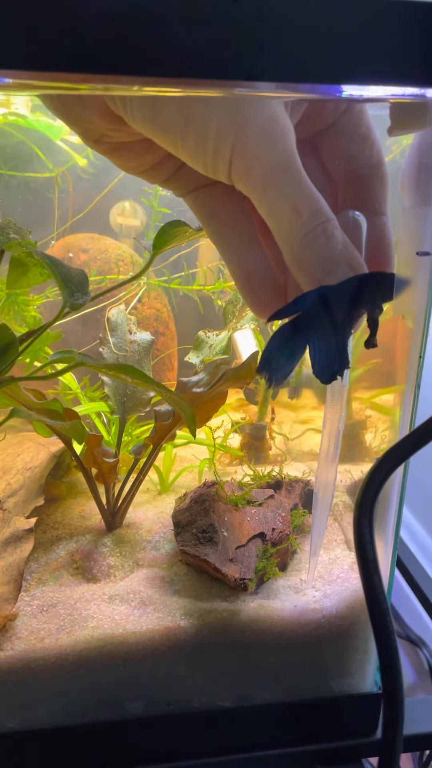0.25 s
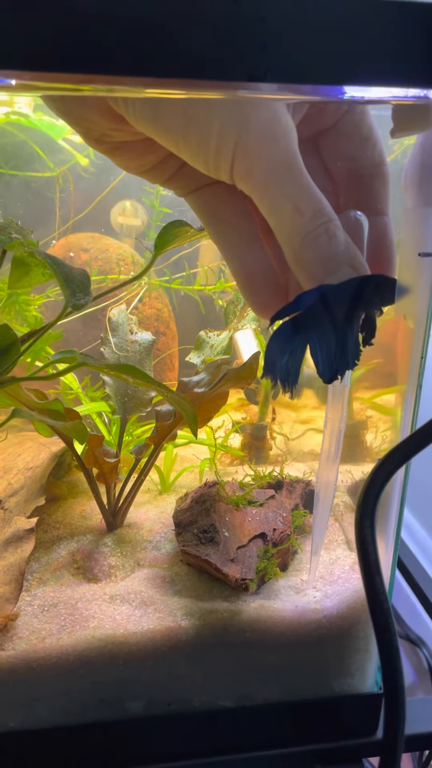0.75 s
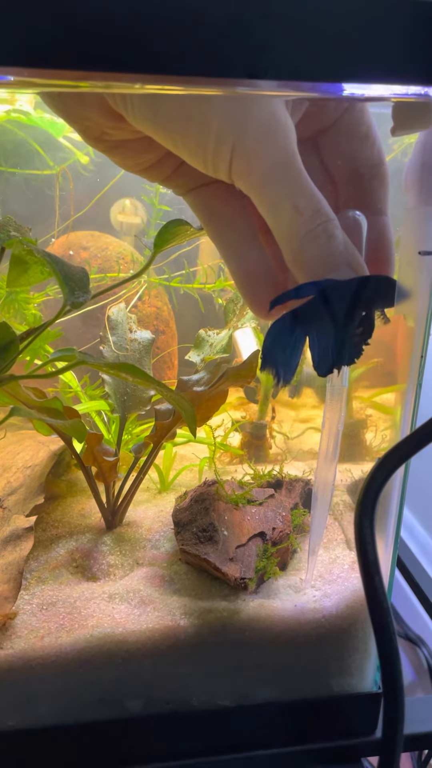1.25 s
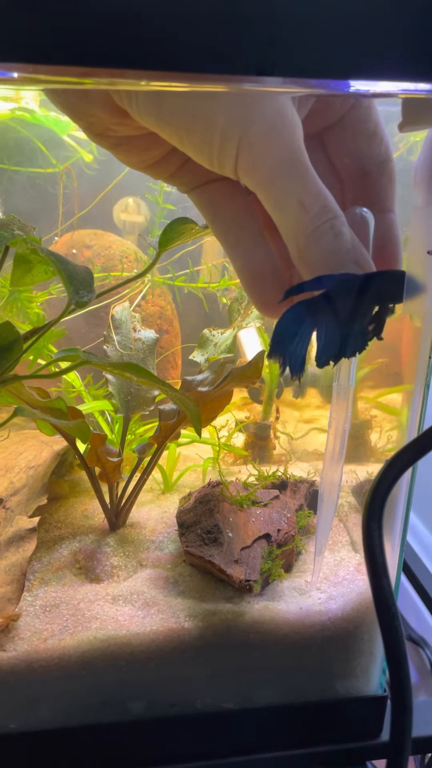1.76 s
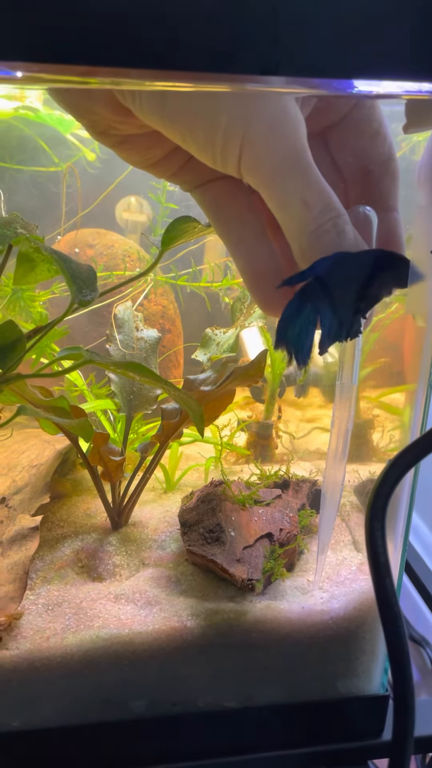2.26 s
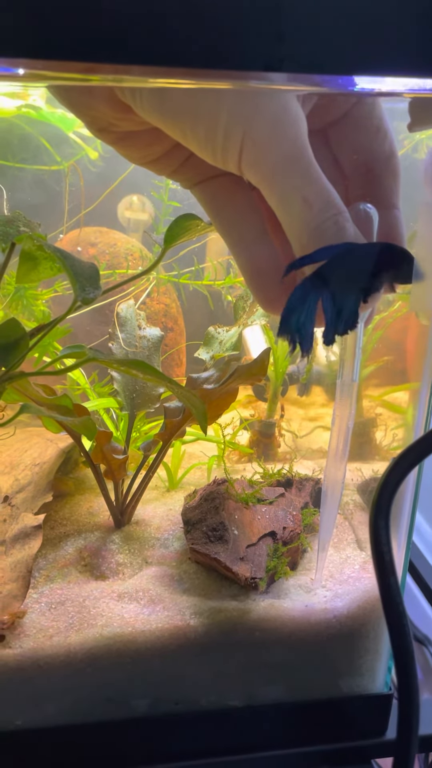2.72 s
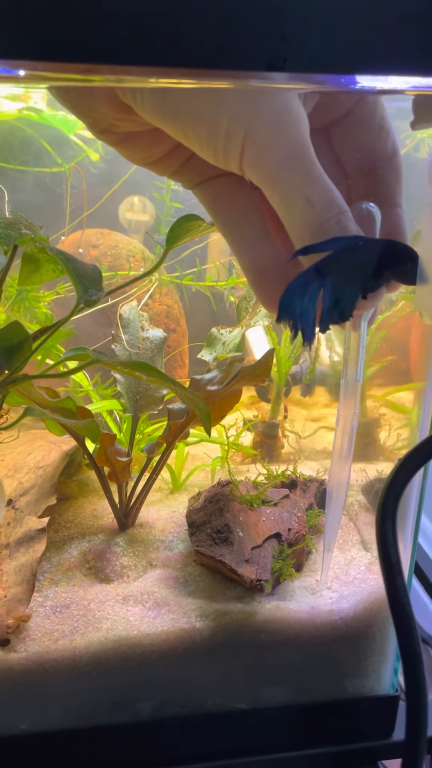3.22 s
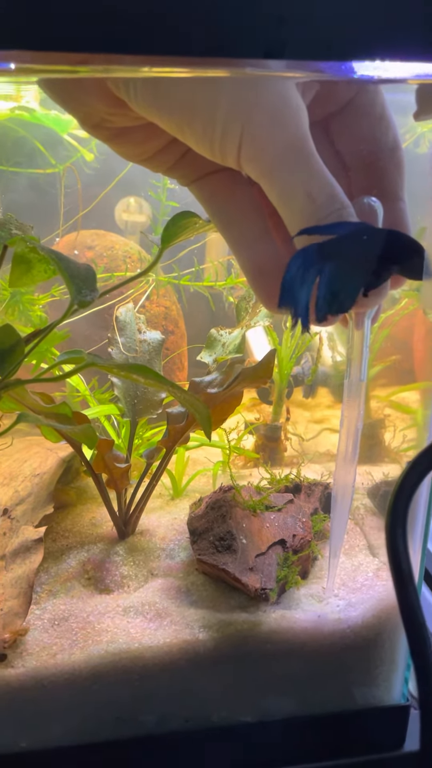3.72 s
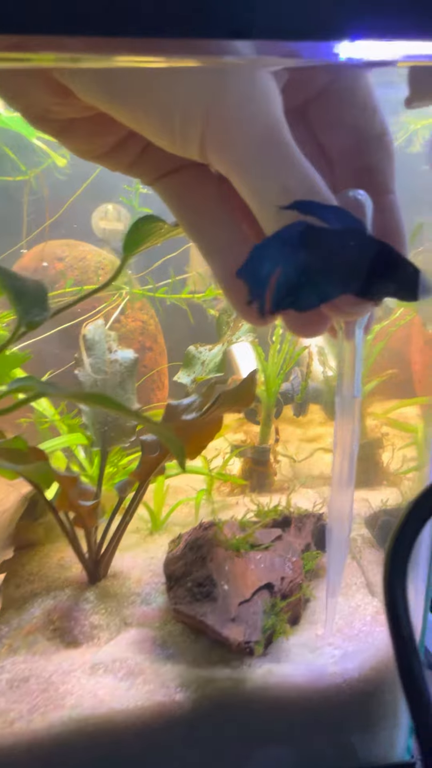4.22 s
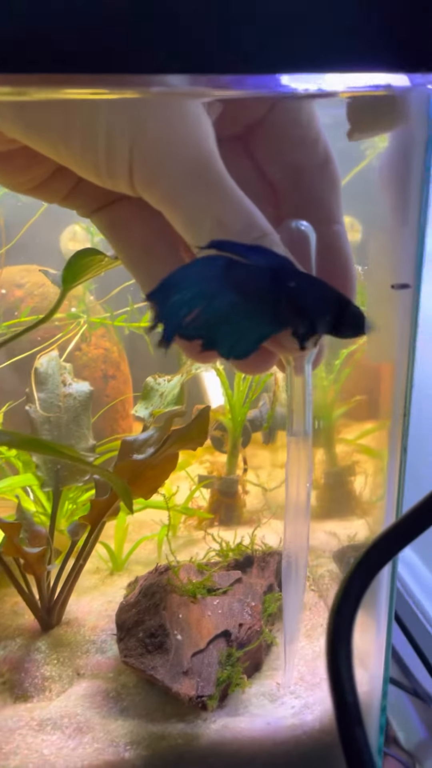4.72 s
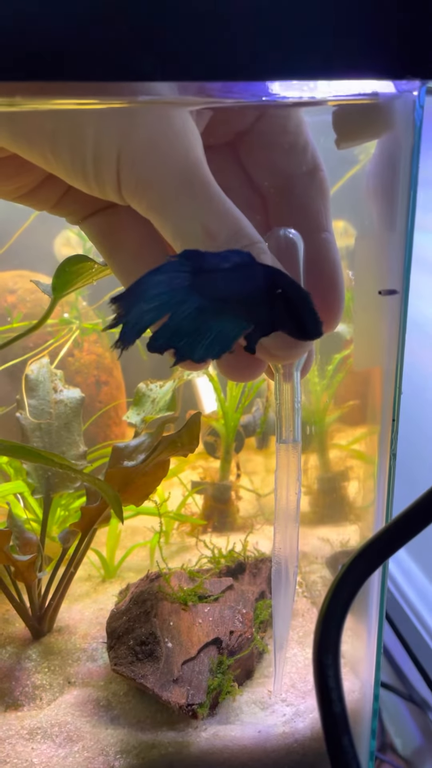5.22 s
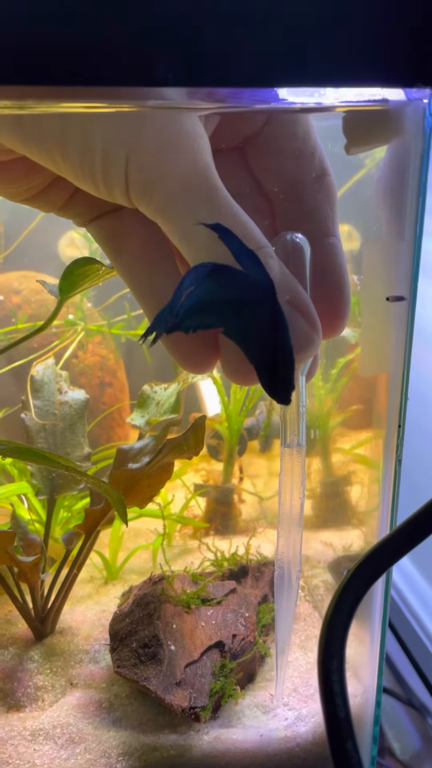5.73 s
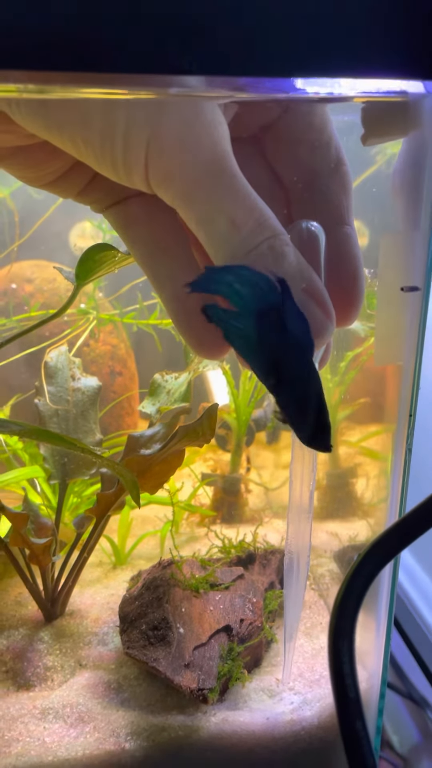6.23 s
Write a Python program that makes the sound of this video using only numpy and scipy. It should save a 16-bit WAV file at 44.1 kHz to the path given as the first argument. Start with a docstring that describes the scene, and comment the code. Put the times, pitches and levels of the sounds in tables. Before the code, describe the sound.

From 0 to about 6.5 s, aquarium pumps run without pause in a quiet room, close to a hand-held phone. A deep steady hum near 60 Hz and its double swells slightly, with a fast pulsing rattle from a diaphragm pump in every cycle. Over it lies a soft, wide rush of air and water. A thin noisy whistle around 1.3 kHz, stronger on the left, flutters irregularly, rising at the start, near 1.7 to 2 s and briefly at 6.2 s. Tiny bright bubble bursts tick throughout, a sharper one at 5 s. A faint, short glass tap comes at 0.56 s. A dull little knock falls at 3.4 s. Between 3.5 and 4.4 s the phone moves, subtly changing the colour of rush and rattle and thinning the whistle. Small, briefly ringing drips follow at 4.8, 5.3 and 5.85 s. The hum continues to the end.

```python
"""Aquarium pumps in a quiet room, close to a hand-held phone. From start to end they hum at the mains
frequency, and a diaphragm pump rattles in every cycle over the rush of air and water. A thin, noisy whistle
varies in level by chance and fine bubbles tick at the surface. A faint tap on the glass comes in the first
second. The phone moves mainly between 3.5 and 4.4 s, near a few drips that ring briefly.
Sines make the hum, filtered noise the rush and whistle, and short decaying rings the rest."""
import sys
import numpy as np
from scipy import signal
from scipy.fft import rfft, irfft, next_fast_len
from scipy.io import wavfile
from scipy.ndimage import uniform_filter1d

SR = 44100
rng = np.random.default_rng(int(sys.argv[2]) if len(sys.argv) > 2 else 0)


def wav_out(sig):
    """Save sig, one row per channel (or a flat mono array), as 16-bit PCM at SR to the path in sys.argv[1]."""
    wavfile.write(sys.argv[1], SR, np.round(np.clip(np.atleast_2d(sig).T, -1, 1) * 32767).astype(np.int16))


N = 285327  # length in samples
MAINS_HZ = 59.986

# How late a sound is at the right microphone port. Each row: frequency in Hz, right lag in radians.
LAG = [(200, 0), (1400, -.2), (2300, 1.2), (4200, 1.1), (4800, -.1), (5700, 1), (7200, 3.14), (8100, 3.2),
       (11000, 6.28), (14500, 9.42), (15800, 10.6)]


def gain_of(db):
    """Turns decibels into a plain factor."""
    return 10 ** (np.asarray(db) / 20)


def read(points, hz):
    """Reads a curve between its points, along a logarithmic frequency scale."""
    f, value = np.transpose(points)
    return np.interp(np.log(hz + 1), np.log(f + 1), value)


def add(mix, s, sound):
    """Adds a short sound to the mix at s seconds, cut off at the end of the mix."""
    part = mix[:, round(s * SR):][:, :sound.shape[1]]
    part += sound[:, :part.shape[1]]


def slow(hz, count):
    """Slow chance: noise smoothed above about hz, with rms 1."""
    noise = rng.standard_normal((count, N))
    x = signal.lfilter([1], [1, -np.exp(-2 * np.pi * hz / SR)], noise)
    return x / x.std()


def moved():
    """Share of the phone's way from the first spot to the second, at every sample."""
    # Each row: time in seconds, share of the way (0-1).
    move = [(0, 0.14), (1.8, 0.05), (3.5, 0.2), (4.4, 1), (6.47, 0.99)]
    return np.clip(np.interp(np.arange(N) / SR, *np.transpose(move)), 0, 1)


def between_spots(levels_db, way):
    """Level in dB at each port as the phone moves between its two spots."""
    first_db, second_db = np.reshape(levels_db, (2, 2, 1))
    return first_db + way * (second_db - first_db)


def ports(a, b, colour_db):
    """Colours a sound and hands it to both microphone ports; only the right port hears b."""
    # How alike the two ports sound. Each row: frequency in Hz, likeness (0-1).
    likeness = [(60, .999), (130, .98), (290, .85), (640, .55), (1400, .5), (3000, .48), (4500, .4),
                (6300, .5), (7100, .99), (8200, .99), (9000, .93), (15000, .97)]
    # Which port is louder. Each row: frequency in Hz, left minus right in dB.
    balance_db = [(60, 2), (180, 2), (550, 3.5), (1650, 1.6), (4970, 1), (8000, -1.5), (15000, 0.5)]
    hz = np.fft.rfftfreq(len(a), 1 / SR)
    same = np.clip(read(likeness, hz), 0, 1)
    left, own = rfft(a), rfft(b)
    tilt = gain_of(read(balance_db, hz) / 2)
    right = same * left + np.sqrt(1 - same ** 2) * own
    right = right * np.exp(-1j * read(LAG, hz))
    pair = np.array([left * tilt, right / tilt])
    return irfft(pair * gain_of(colour_db(hz)), len(a))


def shelf(x):
    """Standing waves lift and thin narrow bands, differently at each port and spot."""
    # Waves between tank, shelf and wall. Each row: frequency in Hz, half width in Hz,
    # boost in dB left and right at the first spot, then left and right at the second.
    standing = [(221, 6.2, 8.5, 6, 8.5, 7), (286, 10, 4.5, 5, 2, 1.5), (697, 47, 3.5, -4, 0, 2),
                (954, 17, -5, -1.5, -13, -2), (1156, 72, -4.5, 7, 5, 2.5), (1508, 14, 0, 9, 3, 9.5),
                (1626, 30, 7.5, 6, 2, 5), (1818, 21, -4, 0, 7, 10), (2040, 54, 5.5, 3.5, 3.5, -0.5),
                (2180, 25, -2, -2, -5, -5), (2297, 50, 8, 8.5, 0.5, 4.5), (2580, 40, 3, 2, 6.5, 5.5),
                (2725, 30, -3, -5, 0, -1), (2887, 25, 4, 5.5, 11.5, 11), (3180, 33, 5, 3, 9, 6.5),
                (3370, 45, 3.5, 5, 0, 1), (3630, 100, 0.5, 1, 0, 1), (3850, 32, 7.5, 6, 7, 7),
                (4000, 40, 0, 0, 3, 6), (4470, 90, 1, 1, 1.5, -1), (5120, 42, 5, 2, 1, 1)]
    size = next_fast_len(N)
    f, z = np.fft.rfftfreq(size, 1 / SR), rfft(x, size)
    boost_db = 0
    for hz, half_hz, *db in standing:
        boost_db = boost_db + np.array(db)[:, None] / (1 + ((f - hz) / half_hz) ** 2)
    first, second = irfft(z * gain_of(boost_db).reshape(2, 2, -1), size)[..., :N]
    return (1 - moved()) * first + moved() * second


def tremble(x, patchy_db=1.4):
    """The hand never holds still: narrow bands drift up and down, partly alike at both ports."""
    z = signal.stft(x, nperseg=2048, noverlap=1024)[2]
    patches = rng.standard_normal((z.shape[2], z.shape[1], 3)).T
    for _ in range(2):
        patches = uniform_filter1d(patches, size=3, axis=1)  # smooth across frequency
        patches = uniform_filter1d(patches, size=9, axis=2)  # smooth along time
    patches = patches[:2] + patches[2]  # each port's own part plus a shared one
    above = np.clip(np.arange(z.shape[1]) / 40, 0, 1)[:, None]  # long waves hardly change
    z = z * gain_of(patchy_db * above * patches / patches.std())
    return signal.istft(z, nperseg=2048, noverlap=1024)[1][:, :N]


def rush(split_hz=6000):
    """Rush of air and water: wide noise in two bands, body and fizz, each with slight random level changes."""
    # Colour of the noise. Each row: frequency in Hz, level in dB per Hz.
    rush_colour = [(25, -92), (40, -87), (70, -79), (110, -77.5), (150, -81.5), (200, -85.5), (340, -86),
                   (600, -87.5), (970, -88), (1150, -89), (2000, -93), (3200, -96.5), (5000, -100.5),
                   (7000, -105.5), (9500, -108.5), (12300, -112.5), (15500, -108)]
    a, b, c, d = rng.standard_normal((4, next_fast_len(N))) * np.sqrt(SR / 2)

    def body_db(hz):
        return read(rush_colour, hz) - 10 * np.log10(1 + (hz / split_hz) ** 4)

    def fizz_db(hz):
        return read(rush_colour, hz) - 10 * np.log10(1 + (split_hz / (hz + 1)) ** 4)

    body = ports(a, b, body_db)[:, :N] * gain_of(.3 * slow(6, count=1))
    fizz = ports(c, d, fizz_db)[:, :N] * gain_of(.7 * slow(5, count=1))
    return body + fizz


def whistle(half_hz=38, vary_db=1.2, vary_hz=25.0, pitch_vary_hz=16.0, firm_per_db=.3, core=.3):
    """Air noise in one narrow hollow, nearer the left port; its level and pitch vary by chance."""
    # Level change and pitch of this noise over time. Each row: time in seconds, level change in dB, pitch in Hz.
    course = [(0, 5, 1325), (.12, 2.5, 1325), (.33, -2.5, 1320), (.46, .5, 1319), (.7, -1, 1319),
              (1.1, -1, 1320), (1.66, -0.5, 1319), (1.73, 4.5, 1314), (1.9, 1, 1322), (1.99, 4.5, 1322),
              (2.06, -1.5, 1326), (2.25, 0, 1322), (2.7, -2, 1321), (2.92, 2.5, 1320), (3.2, -2, 1318),
              (3.8, 0, 1318), (4.4, -0.5, 1310), (5.2, 0, 1308), (6.15, -1, 1305), (6.23, 8, 1302),
              (6.3, 1.5, 1298), (6.47, 0, 1303)]
    # Level before these changes, a row for the first spot and one for the second: left dB, right dB.
    spot_db = [(-58.5, -65.5), (-62, -73)]
    s, change_db, hz = np.transpose(course)
    t, r = np.arange(N) / SR, np.exp(-2 * np.pi * half_hz / SR)
    change_db = np.interp(t, s, change_db)
    a, b = rng.standard_normal((N, 2)).T
    pitch_hz = np.interp(t, s, hz) + pitch_vary_hz * slow(17.8, count=1)[0]
    turn = np.exp(2j * np.pi * np.cumsum(pitch_hz) / SR)
    air = signal.lfilter([1], np.convolve([1, -r], [1, -r]), a + 1j * b)
    firm = core + firm_per_db * np.maximum(change_db, 0)  # more steady tone where the level is raised
    x = (turn * (air / air.std() + firm) / np.sqrt(1 + firm ** 2)).real
    level_db = between_spots(spot_db, moved()) + change_db + vary_db * slow(vary_hz, count=1)
    return gain_of(level_db) * x / x.std()


def tick(db, hz, t60=0.037, spread=0.18):
    """One bursting bubble: a snap with a short noisy tail, heard in one band."""
    # spread: half width of the band as a share of its centre; t60: seconds for the tail to fall 60 dB
    t = np.arange(1024) / SR - .0025
    tail = 0.2 * gain_of(-60 * t / t60)
    snap = gain_of(-60 * abs(t) / 0.005)
    a, b = (t > 0) * (tail + snap) * rng.standard_normal((2, 1024))
    pair = ports(a, b, lambda f: -6 * ((f - hz) / (spread * hz)) ** 2)
    return gain_of(db) * pair / abs(pair).max()


def bubbles(per_s=60., faintest_db=-67):
    """Bubbles bursting at the surface: loud ones from a table, many small ones by chance."""
    # The loudest bursts. Each row: time in seconds, peak in dB, centre of the band in Hz.
    loud_bursts = [(.125, -48, 14000), (.415, -56, 9700), (1.6242, -51, 14000), (1.926, -49, 9660),
                   (2.3401, -51, 12550), (2.8484, -46, 14600), (4.404, -46, 13000), (4.6494, -56, 11000),
                   (4.9886, -42, 15300), (5.024, -53, 11900), (6.082, -44, 11900)]
    out = np.zeros((2, N))
    for s, *sound in loud_bursts:
        add(out, s - .002, tick(*sound))
    for u, v, w in rng.random((int(per_s * N / SR), 3)):
        louder_db = -3 * np.log(1 - .95 * v)  # most are faint, a few up to 9 dB louder
        add(out, u * N / SR, tick(faintest_db + louder_db, 7000 + 8500 * w))
    return out


def taps(rise_cycles=1.6):
    """Taps and drips: each row is a single short ring, often rising, that the room smears a little."""
    # Each row: start in seconds, level in dB, pitch in Hz, seconds to fall 60 dB,
    # pitch rise in Hz per second, left minus right in dB.
    rings = [(.420, -57, 4620, .025, 0, 8), (.5570, -42.5, 1980, 0.032, 8000, 4),
             (0.564, -50, 2580, .025, 20000, 0), (.565, -46.5, 3000, .03, 0, 0),
             (.566, -50, 3350, .022, 30000, 2), (.5695, -50, 3650, .025, 0, 0),
             (.576, -50, 1700, 0.046, -3000, 2), (2.106, -58, 5400, 0.027, 20000, -4),
             (3.396, -47, 620, .09, 0, -8), (4.753, -46, 503, .08, 2000, -2),
             (4.808, -49, 1050, .04, 5000, 4), (5.322, -47, 1240, .06, 10000, 6),
             (5.8545, -46, 4060, 0.031, 15000, -1), (5.8545, -56, 4600, .02, 0, -1)]
    out, t = np.zeros((2, N)), np.arange(3000) / SR
    for s, db, hz, t60, rise, pan_db in rings:
        fade = gain_of(db - 60 * t / t60)
        onset = 1 - np.exp(-t * hz / rise_cycles)
        ring = np.sin(2 * np.pi * (hz + rise * t / 2) * t) * fade * onset
        echoes = rng.standard_normal((2, len(t))) * gain_of(-33 - 60 * t / .06)
        pair = ring + signal.fftconvolve(ring[None], echoes, axes=1)[:, :len(t)]
        add(out, s, gain_of([[pan_db / 2], [-pan_db / 2]]) * pair)
    return out


def buzz(at=.07, scatter=.25):
    """The strongest orders of the rattle as steady sines, loosely lined up early in each cycle."""
    # Each row: multiple of mains, dB rms left and right at the first spot, left and right at the second.
    orders = [(25, -80.0, -83.0, -77.0, -74.0), (34, -90.0, -75.0, -82.0, -82.0),
              (35, -78.0, -75.0, -80.0, -79.0), (37, -77.0, -80.0, -79.0, -80.0),
              (38, -77.0, -90.0, -80.0, -75.0), (39, -75.0, -78.0, -79.0, -80.0),
              (40, -81.0, -81.0, -79.0, -76.0), (43, -76.0, -78.0, -84.0, -78.0),
              (44, -76.0, -78.0, -84.0, -79.0), (45, -78.0, -77.0, -74.0, -77.0),
              (48, -80.0, -81.0, -81.0, -78.0), (49, -81.0, -78.0, -75.0, -76.0),
              (51, -79.0, -89.0, -76.0, -78.0), (53, -82.0, -86.0, -76.0, -80.0),
              (54, -82.0, -78.0, -82.0, -79.0), (55, -84.0, -77.0, -89.0, -86.0),
              (56, -79.0, -76.0, -90.0, -84.0), (58, -77.0, -77.0, -78.0, -89.0),
              (60, -78.0, -79.0, -80.0, -90.0), (62, -81.0, -81.0, -84.0, -87.0),
              (67, -87.0, -90.0, -80.0, -79.0), (68, -79.0, -81.0, -82.0, -86.0),
              (70, -80.0, -79.0, -83.0, -84.0), (72, -83.0, -85.0, -79.0, -81.0),
              (75, -83.0, -84.0, -78.0, -79.0), (79, -83.0, -79.0, -87.0, -84.0),
              (81, -83.0, -79.0, -88.0, -81.0), (84, -83.0, -90.0, -85.0, -81.0),
              (86, -81.0, -82.0, -83.0, -82.0), (92, -90.0, -90.0, -82.0, -82.0)]
    t, out, way = np.arange(N) / SR, np.zeros((2, N)), moved()
    for (k, *db), (a, b) in zip(orders, rng.standard_normal((len(orders), 2))):
        lag = (read(LAG, k * MAINS_HZ) + .9 * b) * np.array([[.5], [-.5]])
        turns = k * (MAINS_HZ * t - at) + scatter * a  # at: share of the mains cycle
        tone = np.sqrt(2) * np.cos(2 * np.pi * turns + lag)
        out += gain_of(between_spots(db, way)) * tone
    return out


def rattle(t60=0.24, head=4.5, head_t60=0.0098):
    """Knocks in every cycle ring the case and room; the ringing is new at each spot of the phone."""
    # Colour of the pump case. Each row: frequency in Hz, level in dB per Hz before the knock's own level.
    case_colour = [(900, -115), (1400, -101), (2000, -105), (2800, -105), (4000, -105), (5500, -105),
                   (7500, -109), (9500, -113.5), (11500, -119), (14000, -122)]
    # Knocks within one mains cycle. Each row: share of the cycle, level in dB,
    # brightness in dB per octave about 4 kHz, unevenness in dB.
    knock_rows = [(.04, -4, -1, 1), (.21, -5, 4, 2.5), (.57, -6, -4, 1)]
    cycles, out, t = np.arange(N / SR * MAINS_HZ - 1), np.zeros((2, N)), np.arange(8192) / SR
    way = moved() * np.pi / 2
    late = np.maximum(t - 64 / SR, 0)  # room ahead of the ring, cut off again below
    # sharp head, diffuse tail
    decay = (late > 0) * (gain_of(-60 * late / t60) + head * gain_of(-60 * late / head_t60))
    decay = decay / np.linalg.norm(decay) * SR / np.sqrt(2 * MAINS_HZ)
    for share, db, bright_db, uneven_db in knock_rows:
        knocks = np.zeros(N + 64)
        places = np.round((cycles + share) / MAINS_HZ * SR).astype(int)
        knocks[places] = gain_of(db + uneven_db * rng.standard_normal(len(cycles)))

        def colour_db(hz):
            return read(case_colour, hz) + bright_db * np.log2(np.maximum(hz, 300) / 4000)

        for window in (np.cos(way), np.sin(way)):  # first spot, second spot
            a, b = rng.standard_normal((2, len(t))) * decay
            ring = ports(a, b, colour_db)
            out += signal.oaconvolve((knocks[:N] * window)[None], ring, axes=1)[:, 64:N + 64]
    return out


def hum():
    """Sines on the mains orders: three low ones sway the case, the upper ones line up into a thump."""
    # Each row: multiple of mains, dB rms left and right at the first spot, left and right at the second.
    orders = [(1, -43.5, -43.5, -43.5, -43.5), (2, -43, -43.5, -43, -43.5), (3, -54.5, -54.5, -54, -54),
              (4, -72, -73, -71, -71.5), (5, -62.5, -63.5, -62, -63), (6, -57.5, -61, -58.5, -61),
              (7, -71.5, -69.5, -69.5, -68.5), (8, -69, -73.5, -67, -72), (9, -66, -63, -64, -62.5),
              (10, -68.5, -69.5, -67.5, -68.5), (11, -71, -83, -70, -78), (12, -65.5, -73, -67.5, -72),
              (13, -64.5, -65.5, -66, -65.5), (14, -62.5, -72.5, -68.5, -71), (15, -74, -74, -80, -73.5),
              (17, -74, -76, -71, -76), (19, -75.5, -79, -71, -79)]
    # The lowest order swells and fades. Each row: time in seconds, level change in dB.
    swells = [(0, 0), (.4, 1), (.85, -2.5), (1.6, 1), (2.2, -1.2), (3.3, 1.1), (4.1, -1.3), (4.6, 2),
              (5.4, 0), (6.47, 1.5)]
    # Upper orders reach the ports apart. Each entry: multiple of mains, right lag in radians.
    port_lag = {4: .4, 5: .2, 6: -.3, 9: -.4, 11: 1.9, 12: -1.2, 13: -.3, 15: -.8}
    # Share of the mains cycle at which the thump arrives, at the first and the second spot.
    thump_at = (.093, .065)
    # Orders that swing apart from the thump. Each entry: multiple of mains, share of its own cycle.
    swing = {7: .37, 8: .53, 9: .13, 14: -.08, 15: .13}
    # Faint steady tones of a slower rotor. Each row: frequency in Hz, dB rms.
    rotor = [(48.5, -69.5), (73.7, -70), (80.8, -64.5), (101, -67.5), (161.6, -72.5)]
    t, out, way = np.arange(N) / SR, np.zeros((2, N)), moved()
    arrival = thump_at[0] - way * (thump_at[0] - thump_at[1])
    for k, *db in orders:
        if k < 4:
            turns = k * (MAINS_HZ * t + .38) + .25 * (k == 2)  # sway
        else:
            turns = k * (MAINS_HZ * t - arrival) + .8 + swing.get(k, 0)  # thump
        lag = port_lag.get(k, 0) * np.array([[.5], [-.5]])
        tone = np.sqrt(2) * np.cos(2 * np.pi * turns + lag)
        if k == 1:
            tone = tone * gain_of(np.interp(t, *np.transpose(swells)))
        out += gain_of(between_spots(db, way)) * tone
    for hz, db in rotor:
        out += gain_of(db) * np.sqrt(2) * np.sin(2 * np.pi * (hz * t + rng.random()))
    return out


def scene():
    """All layers together; the trembling hand touches the rush, the rattle and the buzz."""
    trembling = tremble(shelf(rush()) + rattle() + buzz())
    return trembling + whistle() + bubbles() + taps() + hum()


def record(dry, edge_hz=15760):
    """The band limit: a steep filter takes away what lies above edge_hz."""
    low_pass = signal.firwin(1023, edge_hz, window=("kaiser", 9), fs=SR)
    return signal.oaconvolve(dry, low_pass[None], "same")


dry = scene()
out = record(dry)
wav_out(out)
```